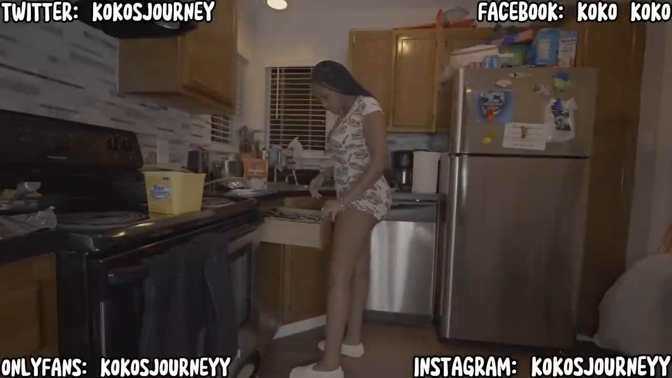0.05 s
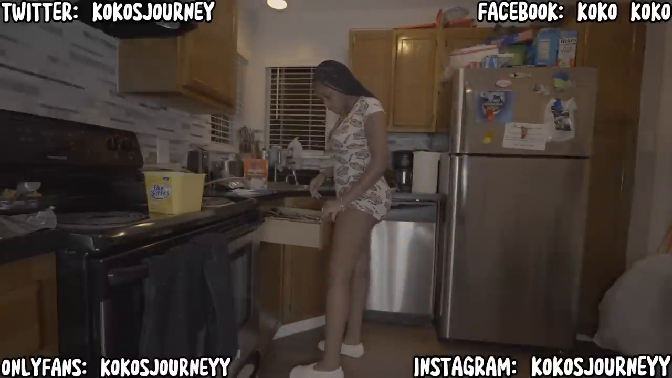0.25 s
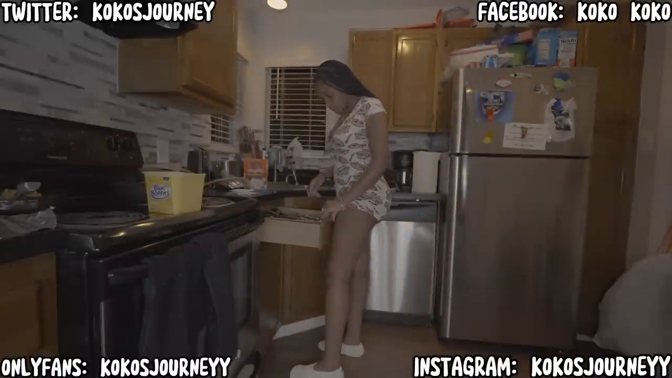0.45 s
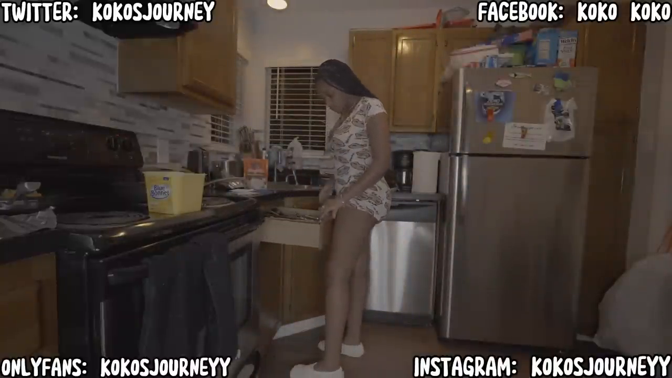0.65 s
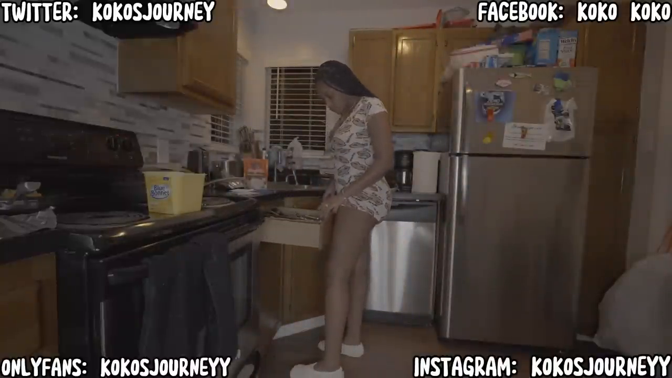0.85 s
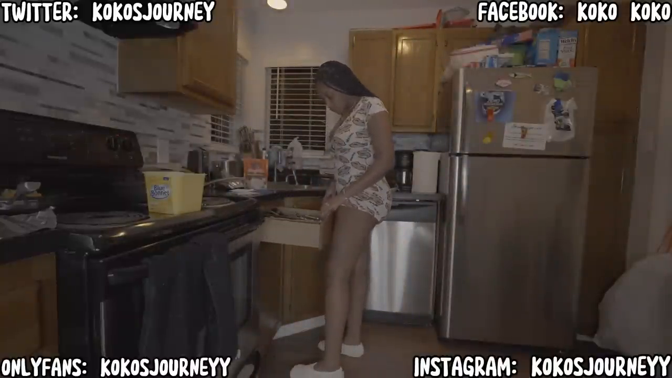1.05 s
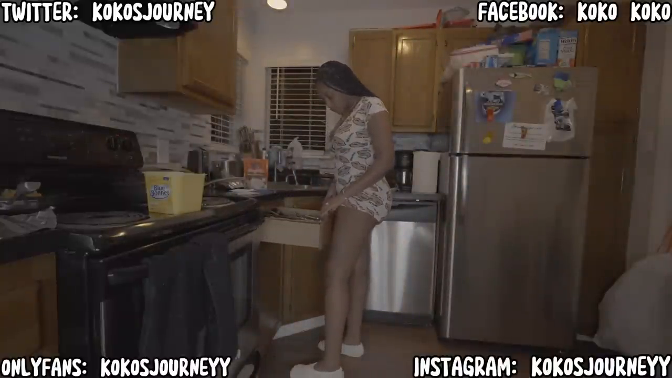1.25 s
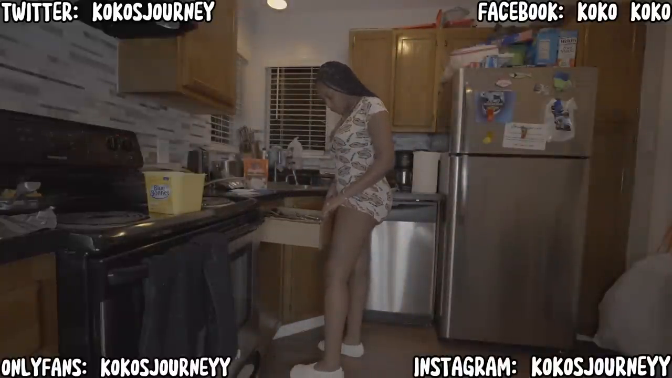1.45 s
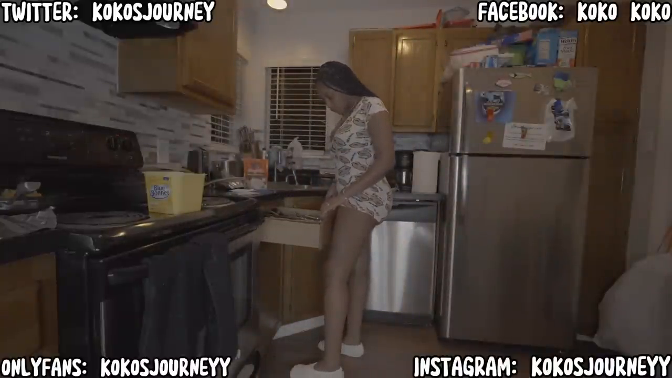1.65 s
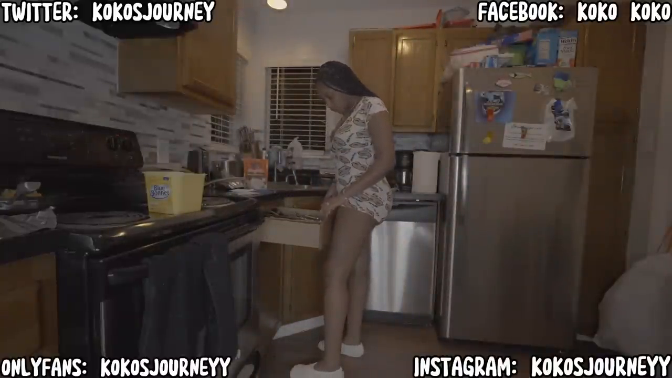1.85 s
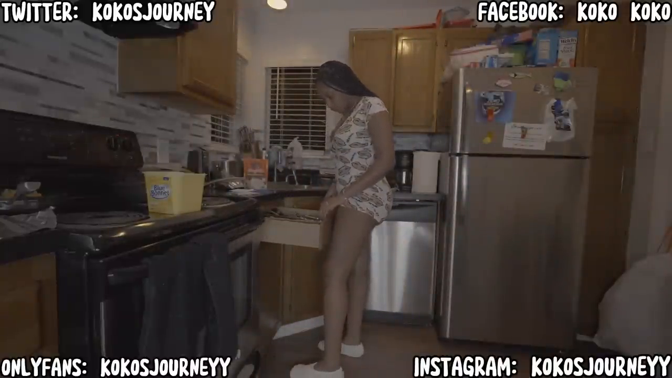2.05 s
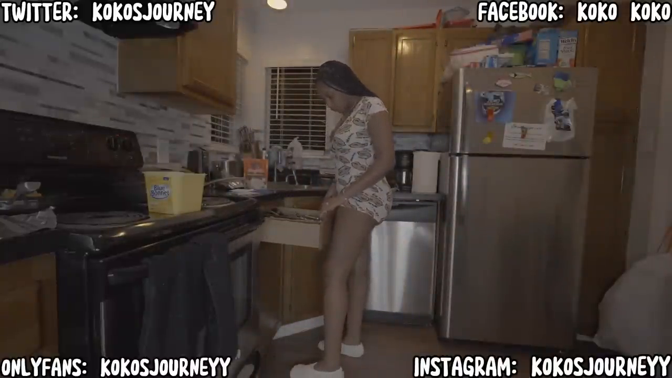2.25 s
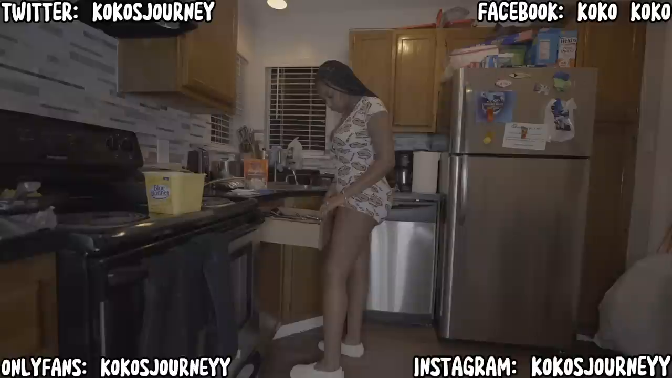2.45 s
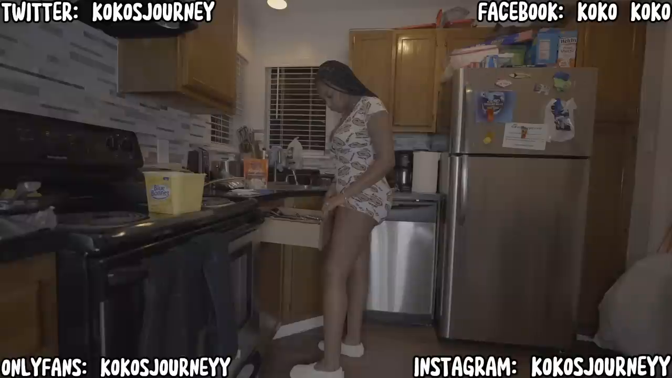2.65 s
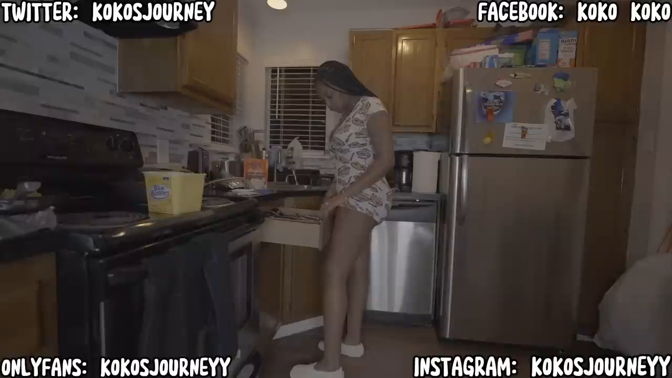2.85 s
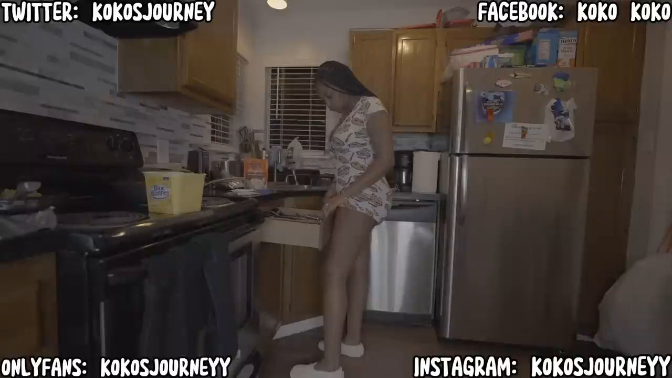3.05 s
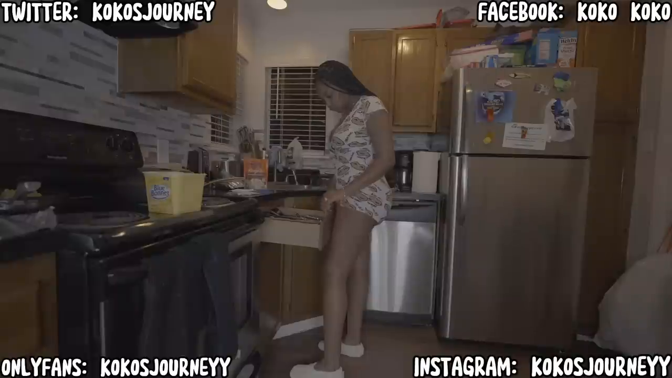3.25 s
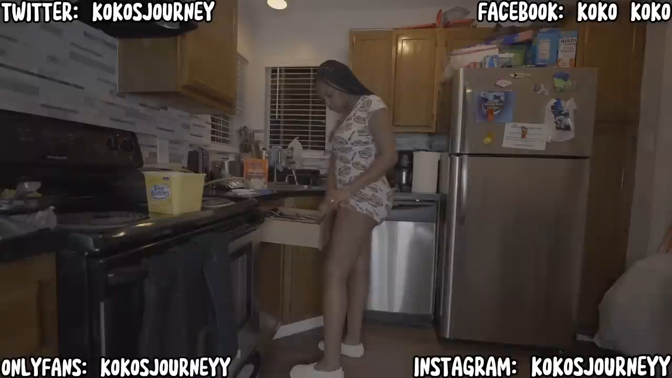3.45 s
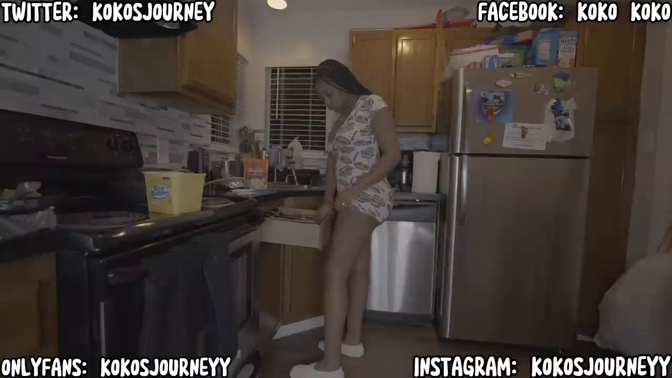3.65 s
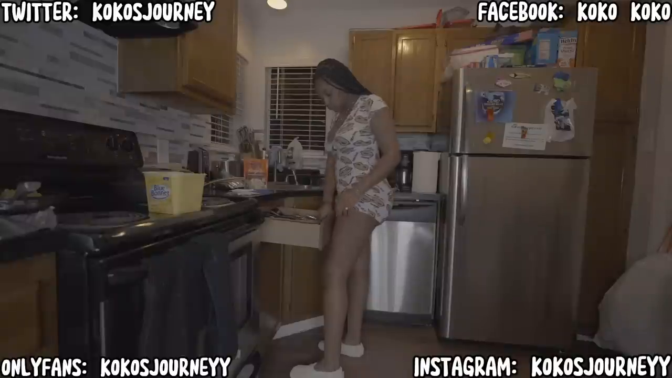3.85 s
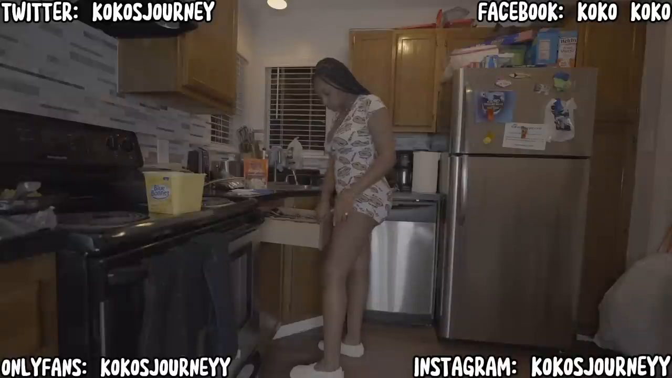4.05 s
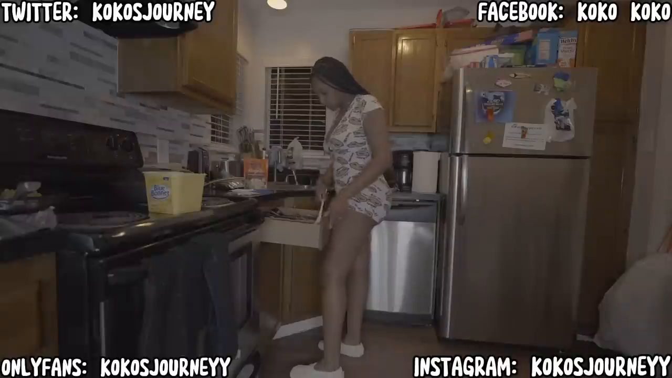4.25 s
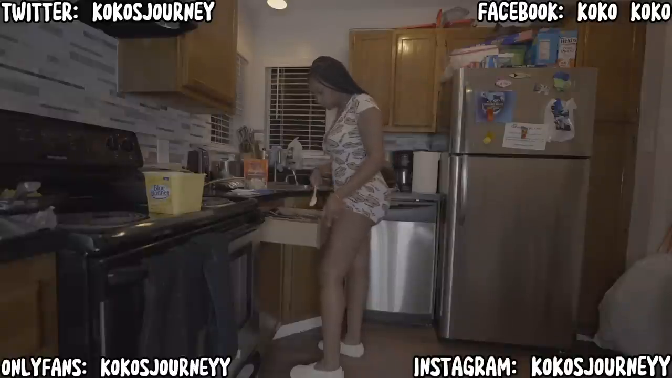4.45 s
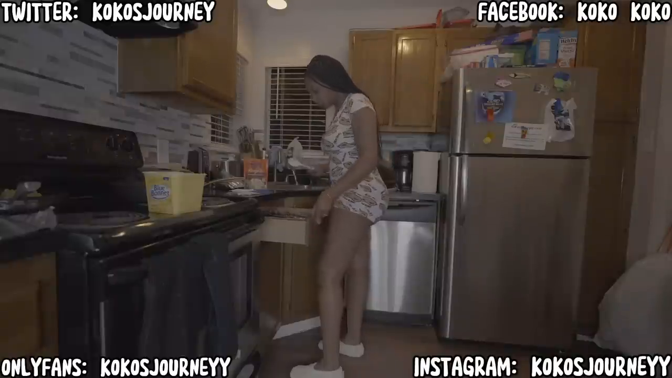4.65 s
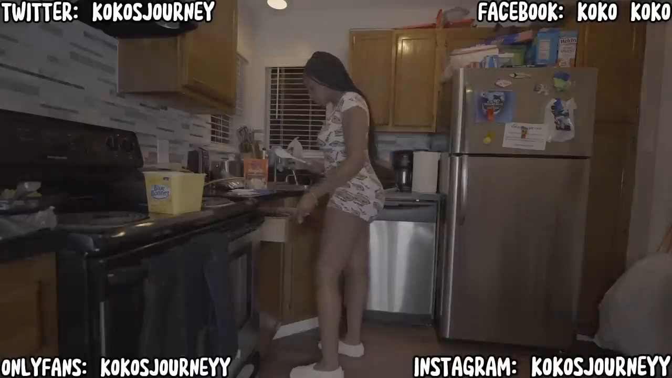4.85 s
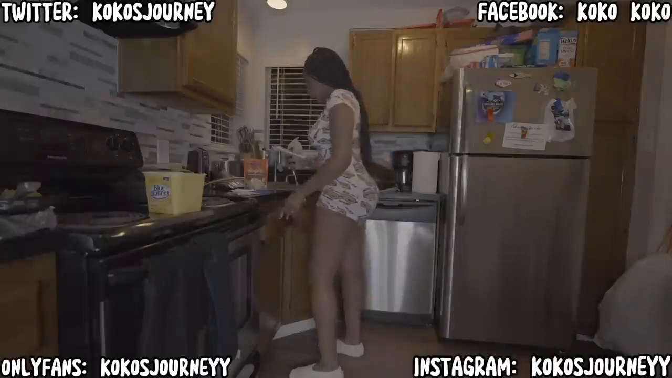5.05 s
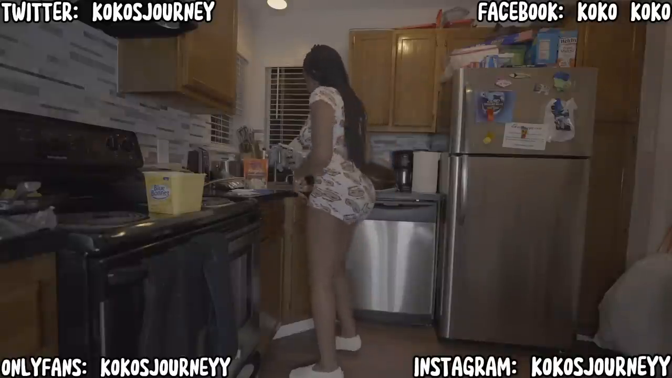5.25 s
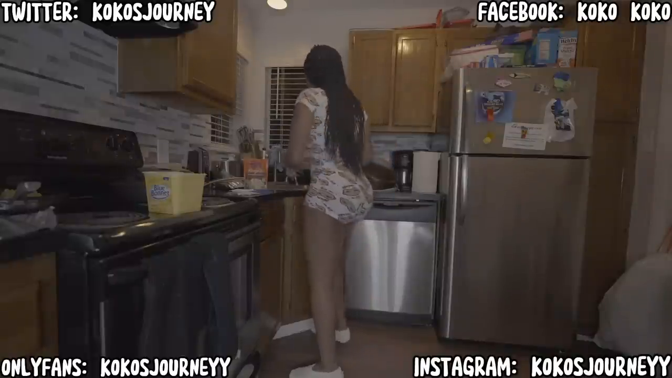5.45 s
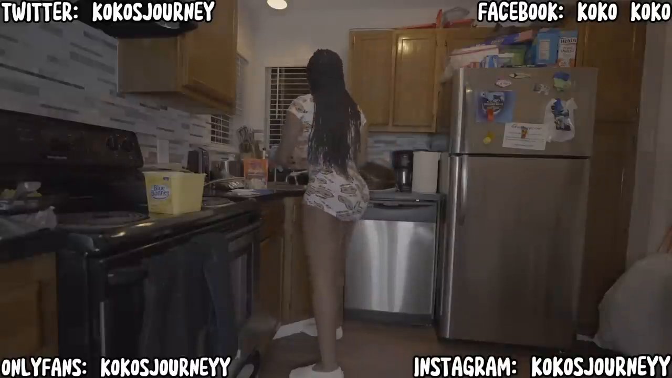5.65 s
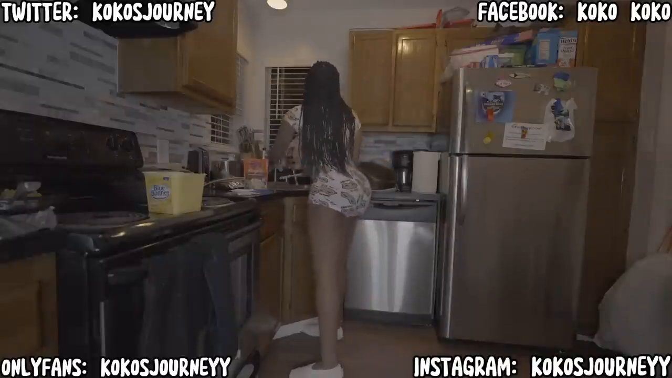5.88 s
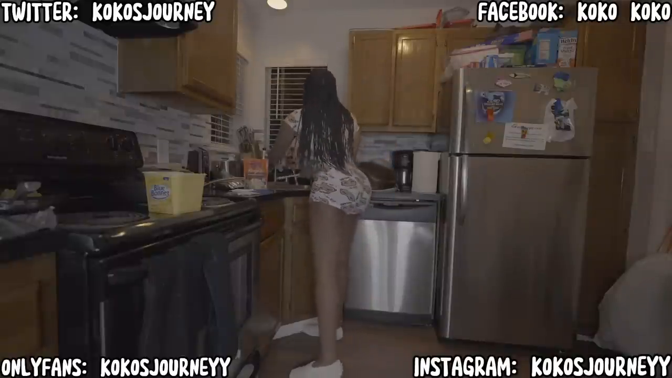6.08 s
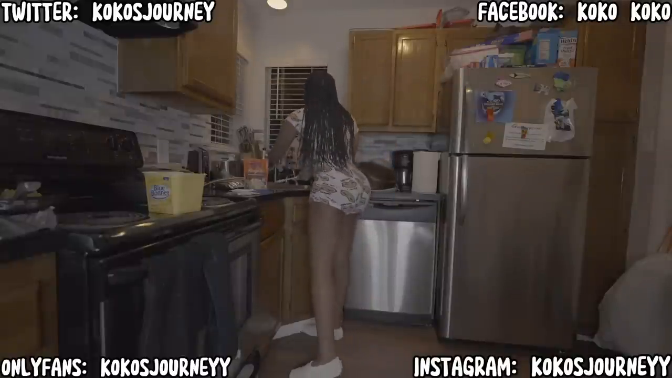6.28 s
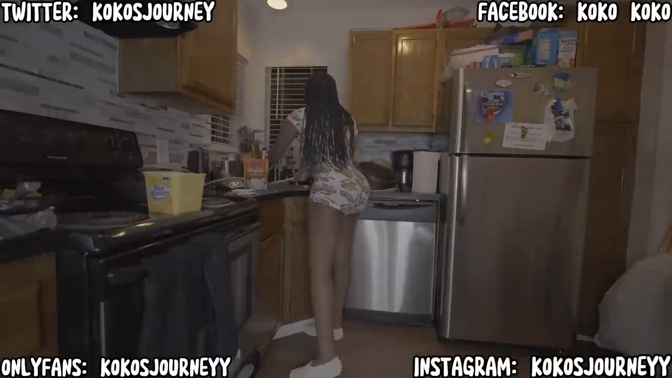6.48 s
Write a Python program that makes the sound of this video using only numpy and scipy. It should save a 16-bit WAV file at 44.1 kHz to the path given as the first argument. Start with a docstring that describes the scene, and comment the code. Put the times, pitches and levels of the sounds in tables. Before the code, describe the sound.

Someone rummages through a kitchen cutlery drawer, utensils clacking and rattling in their tray, then draws out a ringing blade and slams the drawer shut.

```python
"""A small, hard kitchen, where someone rummages in a cutlery drawer a few metres from a microphone pair.
Utensils swish, and clack in their tray: chattering impacts excite damped resonances. Knocks excite the wood.
A blade is drawn out: stick-slip friction sets its steel modes ringing, and clinks ring a fork's modes.
The drawer rolls along its runners and slams, booming; cutlery slides over itself, the contents rebound,
and something brushes along the counter. Filtered noise supplies the quiet air of the room."""
import sys
import numpy as np
from scipy import signal
from scipy.fft import rfft, irfft, next_fast_len
from scipy.io import wavfile

SR = 44100
rng = np.random.default_rng(int(sys.argv[2]) if len(sys.argv) > 2 else 0)


def dump_mix(stems):
    """Bounce the given channels to the path in sys.argv[1] as a 16-bit WAV at rate SR."""
    frames = np.atleast_2d(stems).T  # one column per channel
    limited = np.clip(frames, -1, 1)  # hard clip at full scale
    pcm = np.round(limited * 32767).astype(np.int16)
    wavfile.write(sys.argv[1], SR, pcm)


N = 287486
HZ = np.fft.rfftfreq(4096, 1 / SR)  # frequency axis of every response
TIME = np.arange(N) / SR

# Levels in the tables are relative: the gains of the functions are added to them.
# The drawer hitting its stop. Start in seconds, level in dB, treble against level in dB, chatter T60 in seconds.
SLAM = (5.272, -10.5, -18.5, 1)
# The blade dragged out, then its tip flicking free. Each row: start in seconds, length in seconds, level in dB.
DRAWS = [(4.276, .445, -19.3), (4.77, .02, -16.3)]
# Broad colour of the wooden drawer. Each row: frequency in Hz, relative density in dB per Hz.
WOOD = [(71, -58), (120, -16), (204, -21), (251, -3.5), (473, -8.5), (535, -2.5), (727, -6), (1070, -5),
        (1210, -15.5), (3240, -6.5), (5190, -12.5), (10200, -12.5), (16000, -25)]
# Broad colour of rubbed steel. Each row: frequency in Hz, relative density in dB per Hz.
STEEL = [(710, -30), (1200, 6), (3740, 2.5), (4310, 7), (5300, 3), (9210, 6), (11100, 7), (16000, 6.5)]


def tray(gain_db=29.5):
    """Impact excitation: each clack sounds the tray's hollow note and random damped resonances of a utensil."""
    # Broad colour of the tray. Each row: frequency in Hz, relative density in dB per Hz.
    tray_colour = [(120, -42), (200, -32), (320, -2), (430, -12), (720, -8.5), (900, -1), (1080, -7),
                   (1500, -2.5), (1900, -4), (2300, -1), (4000, -0.5), (9500, -0.5), (13300, -4.5),
                   (16000, -8)]
    # Its resonances. Each row: frequency in Hz, width in Hz, lift in dB.
    tray_peaks = [(310, 40, 4.5), (1415, 100, 5), (1624, 127, 7), (2210, 270, 5.5), (2610, 90, 4),
                  (3050, 110, 4.5), (5050, 110, 6)]
    # Its hollow note, a close pair. Each row: frequency in Hz, width in Hz, full lift in dB.
    hollow_pair = [(860, 110, 7), (922, 95, 10)]
    # The ring of a really hard clack. Each row: frequency in Hz, width in Hz, full lift in dB.
    clank_peaks = [(1350, 500, 3)]
    out = np.zeros((2, N))
    response = body(tray_colour, tray_peaks)
    for s, db, treble_db in shakes():
        # heavy blows reach the tray's floor and sound its hollow note most
        hollow = np.interp(db, [-28, -12], [.5, .95]) * bumps(hollow_pair)
        utensil = bumps([(hz, 300, 3) for hz in rng.uniform(1800, 13000, size=8)])
        clank = np.interp(db, [-14, -12], [0, 1]) * bumps(clank_peaks)
        struck = response + hollow + clank + utensil
        add(out, s, blow(struck, db + gain_db, treble_db, t60=.036, tick_db=-2))
    return out


def shakes():
    """Repeated impacts, yielded as (s, level dB, treble dB): brighter through a shake as loose steel catches up."""
    # Utensils clacking in the tray. Each row: time in seconds, level in dB.
    clack_rows = [(0.832, -15.3), (1.182, -12.5), (1.203, -16.5), (1.23, -16), (1.304, -16.5),
                  (1.436, -17.5), (1.473, -15), (1.607, -22), (1.647, -15), (1.795, -17), (1.841, -14),
                  (1.96, -17.5), (2.006, -14.5), (2.035, -14.5), (2.169, -12), (2.197, -14), (2.237, -14),
                  (2.376, -21.5), (2.394, -13), (2.429, -16), (2.565, -20), (2.585, -17), (2.632, -14.5),
                  (2.774, -16), (2.81, -18), (2.907, -19.5), (2.966, -16), (2.999, -17), (3.101, -11),
                  (3.173, -14)]
    pause_s = .085  # a longer gap ends a shake
    gentle_db = -16  # a shake whose first clack is weaker is led by a faint nudge
    nudge_lead_s, nudge_db, nudge_treble_db = .046, -28, -12
    dull_db, bright_db = -9.5, -2.5
    clacks = np.array(clack_rows)
    shake_starts = np.flatnonzero(np.diff(clacks[:, 0]) > pause_s) + 1
    for shake in np.split(clacks, shake_starts):
        start, first_db = shake[0]
        if first_db < gentle_db:
            yield start - nudge_lead_s, nudge_db, nudge_treble_db
        # reversed, so that a lone clack is bright
        trebles_db = np.linspace(bright_db, dull_db, len(shake))[::-1]
        for (s, db), treble_db in zip(shake, trebles_db):
            yield s, db, treble_db


def drawer(gain_db=28, treble_db=7, octaves=0.54):
    """Local modal excitation: each spot on the wooden box favours its own register, the stiff ones most."""
    # Blows on the wood. Each row: time in seconds, level in dB, treble against level in dB, favoured pitch in Hz.
    knock_rows = [(0.981, -28.5, -6, 1500), (1.003, -17, -11, 2000), (1.016, -12.7, -17, 920),
                  (3.44, -29.5, -19, 1100), (3.599, -26.5, -45, 250), (3.613, -23.5, -23, 340),
                  (3.723, -23.5, -21, 290), (3.755, -19.5, -21, 1400), (3.785, -15.5, -36, 660),
                  (3.788, -12, -9, 1600), (3.886, -20, -11, 270), (3.918, -13.3, -3, 525),
                  (4.056, -26, -6, 1860), (4.093, -13.5, -2, 516), (4.115, -16.5, -4, 2200),
                  (4.14, -18.5, -2, 3600), (4.168, -12, -45, 320), (4.205, -16, -23, 640),
                  (4.244, -16, -43, 290), (4.295, -20.5, -8, 2290), (4.356, -17.5, -5, 1100),
                  (4.569, -20, -10, 1300), (4.815, -17.5, -18, 880), (5.095, -19, -20, 400),
                  (5.74, -40, -8, 330)]
    # Resonances of the wood. Each row: frequency in Hz, width in Hz, lift in dB.
    wood_peaks = [(324, 78, 3.6), (530, 41, 3.3), (700, 180, 1.05), (1400, 420, 2.4), (2480, 140, 1.3)]
    bump_t60, knock_t60 = .11, .055  # chatter of a dull bump and of a sharp knock, s
    out = np.zeros((2, N))
    response = body(WOOD, wood_peaks)
    for s, db, bright_db, hz in knock_rows:
        focus_db = np.interp(hz, [500, 1600], [10, 17])
        distance = np.log2((HZ + 1) / hz) / octaves
        spot = focus_db * np.exp(-distance ** 2)
        t60 = np.interp(bright_db, [-40, -18], [bump_t60, knock_t60])
        add(out, s, blow(response + spot, db + gain_db, bright_db + treble_db, t60, tick_db=-4))
    return out


def slam(gain_db=31.6, treble_db=15, boom_db=-.5):
    """Panel modes: the drawer front strikes the cabinet, whose panels boom as decaying sinusoids."""
    # Broad colour of the cabinet. Each row: frequency in Hz, relative density in dB per Hz.
    cabinet_colour = [(18, -40), (30, -9), (233, -1.5), (415, -2), (512, -1), (684, -4.5), (780, 0),
                      (988, -6), (1910, -4), (4190, -14.5), (11400, -29), (14000, -33), (16000, -31)]
    # Panel modes. Each row: frequency in Hz, level in dB, T60 in seconds.
    boom_modes = [(64.2, -28, 0.71), (78, -30, .5), (109.7, -27, 0.5), (157, -20.5, .4), (239, -22, 0.28),
                  (323, -22, .25)]
    out = np.zeros((2, N))
    t = np.arange(SR) / SR
    s, db, bright_db, t60 = SLAM
    add(out, s, blow(body(cabinet_colour), db + gain_db, bright_db + treble_db, t60, tick_db=-5))
    boom = np.zeros(len(t))
    for hz, mode_db, ring in boom_modes:
        boom += amp(mode_db - 60 * t / ring) * np.sin(2 * np.pi * (hz * t + rng.random()))
    onset = 1 - np.exp(-t / 0.0029)
    add(out, s, amp(boom_db) * boom * onset)
    return out


def rebounds(gain_db=28, treble_db=-6, count=3):
    """Inelastic rebound: thrown forward by the slam, the contents bump the drawer's front, weaker each time."""
    spacing_s, first_db, loss_db, chatter_t60 = .074, -17, 3.5, .18
    out = np.zeros((2, N))
    response = body(WOOD, [(1400, 1200, 11)])
    for k in range(count):
        s = SLAM[0] + (k + 1) * spacing_s
        db = first_db - k * loss_db
        add(out, s, blow(response, db + gain_db, treble_db, chatter_t60, tick_db=-6))
    return out


def blade(rub_db=-3, ring_db=-.5, flick_db=-10, ring_share=.87, bend_db=0):
    """Friction-driven vibration: a blade dragged over other steel rubs brightly and rings in its modes."""
    # High modes of the blade. Each row: frequency in Hz, relative level in dB.
    blade_modes = [(5873, -48), (6175, -40.5), (7639, -42), (8096, -39), (9830, -44), (10427, -45),
                   (11106, -37.5), (11429, -38), (12209, -45), (12678, -38), (13060, -42), (14126, -37),
                   (15122, -30.5), (15601, -38), (15665, -48)]
    # The blade catching and singing in its low bending mode. Each row: start in seconds, level in dB.
    catch_rows = [(4.29, -32), (4.48, -35), (4.565, -27), (4.62, -27), (4.7, -34)]
    bend_hz, catch_s = 4312, .095
    ring_rise_s, ring_sag, ring_stop = .23, 8, 150  # s, dB/s, dB/s
    rub = friction(body(STEEL), per_s=900, spread_db=3) * dragging() * waver(depth_db=1.2, per_s=30)
    modes = sum(amp(db) * sing(hz, width_hz=45) for hz, db in blade_modes)
    # the ringing builds slowly and begins to die before the rubbing stops
    start, length, db = DRAWS[0]
    ringing = stroke(start, ring_share * length, db + ring_db, ring_rise_s, ring_sag, ring_stop)
    start, length, db = DRAWS[1]
    ringing += stroke(start, length, db + flick_db, length, ring_sag, ring_stop)
    out = amp(rub_db) * rub + evened(modes) * ringing
    t = np.arange(round(catch_s * SR)) / SR
    swell = np.sin(np.pi * t / catch_s) ** 2
    for s, db in catch_rows:
        tone = np.sin(2 * np.pi * (bend_hz * t + .3 * rng.random((2, 1))))
        add(out, s, amp(db + bend_db) * np.sqrt(2) * tone * swell)
    return out


def dragging():
    """Friction gain of the blade: it starts at once, grows as the blade comes out, and stops quickly."""
    rise_s, swell_db_per_s, stop_db_per_s = .008, 9, 220
    return sum(stroke(*draw, rise_s, -swell_db_per_s, stop_db_per_s) for draw in DRAWS)


def sing(hz, width_hz):
    """Noise-driven resonance: one steel mode kept ringing by friction, swelling as the contact point moves."""
    pole = np.exp((2j * np.pi * hz - np.pi * abs(width_hz)) / SR)
    swell = waver(depth_db=4, per_s=20)
    ring = signal.lfilter([1], [1, -pole], rng.standard_normal((2, N))).real
    return evened(ring * swell)


def cutlery(slide_db=-2, ping_db=-9, swish_db=0):
    """Friction and micro-impacts: loose pieces slide and jingle, also while the blade drags past them."""
    # Loose cutlery sliding over itself. Each row: start in seconds, length in seconds, level in dB.
    slide_rows = [(4.08, .19, -16.5), (5.285, .29, -15.7)]
    # A hand swishing lightly among the utensils. Each row: start in seconds, length in seconds, level in dB.
    swish_rows = [(-.03, .085, -23), (.321, .125, -27.7)]
    # Broad colour of a swish. Each row: frequency in Hz, relative density in dB per Hz.
    swish_colour = [(710, -48), (1200, -7), (1510, -6), (1700, 5), (2320, -0.5), (3790, 1.5), (4220, -0.5),
                    (5900, 8), (14500, -3), (16000, -19)]
    # strokes: rise in s, sag in dB/s, stop in dB/s
    sliding = sum(stroke(*row, .1, 66, 230) for row in slide_rows)
    swishing = sum(stroke(*row, .045, 28, 145) for row in swish_rows)
    slide = friction(body(STEEL), per_s=500, spread_db=3) * sliding
    pings = jingle() * (sliding + .6 * dragging())
    swish = hiss(body(swish_colour, [(5950, 250, 4), (7640, 150, 3)])) * swishing
    return amp(slide_db) * slide + amp(ping_db) * pings + amp(swish_db) * swish


def jingle(count=1100, t60=0.18):
    """Micro-impacts: small touches between loose pieces, each a decaying ping at a pitch of its own."""
    out = np.zeros((2, N))
    t = np.arange(SR // 6) / SR
    for when, pitch, size, *phase in rng.random((count, 5)):
        hz = 3000 + 12500 * pitch ** 1.3
        ping = np.sin(2 * np.pi * (hz * t + np.array(phase)[:, None]))
        add(out, when * N / SR, ping * amp(9.6 * size - 60 * t / t60))
    return evened(out)


def fork(gain_db=-1, t60=0.4, spread_db=3, beat_hz=25):
    """Modal beating: a fork struck by its neighbours rings in close pairs of modes, scaled for each piece."""
    # Clinks. Each row: time in seconds, level in dB, pitch factor of the piece.
    clink_rows = [(3.625, -35, 0.75), (3.791, -18.5, 1), (3.921, -28, 0.58), (4.057, -42, 0.97),
                  (4.138, -18, 0.7), (4.283, -20, 0.96), (4.774, -26, 0.73), (5.5, -28, .44)]
    # Modes at pitch factor 1. Each row: frequency in Hz, relative level in dB.
    fork_modes = [(5857, -12), (7687, -8), (10379, -4), (11111, -7), (12209, -5), (13630, -8), (13802, -2),
                  (14125, -11), (15137, -3)]
    out = np.zeros((2, N))
    t = np.arange(SR // 2) / SR
    onset = 1 - np.exp(-t / 0.0035)
    hz, db = np.transpose(fork_modes)
    for s, strength_db, pitch in clink_rows:
        # axes: ear, member of the pair, mode, time
        size, detune, phase = rng.standard_normal((3, 2, 2, len(hz), 1))
        mode_hz = pitch * hz[:, None] + beat_hz * detune
        modes = amp(db[:, None] + spread_db * size) * np.sin(2 * np.pi * (mode_hz * t + phase))
        decay = amp(strength_db + gain_db - 60 * t / t60)
        add(out, s, evened(modes.sum((1, 2))) * decay * onset)
    return out


def rubbing(roll_db=-4, brush_db=0):
    """Structure-borne friction: the runners rumble through the drawer's wood; later a soft brush on the counter."""
    # The drawer pushed along its runners at an even pace. Start in seconds, length in seconds, level in dB.
    roll_row = (4.3, 1.0, -27.2)
    # Something brushing along the counter. Start in seconds, length in seconds, level in dB.
    brush_row = (6.142, .4, -28)
    # Broad colour of the runners. Each row: frequency in Hz, relative density in dB per Hz.
    runner_colour = [(88, -48), (150, -25.5), (303, -6), (422, -9), (689, -6.5), (790, -4), (960, -5.5),
                     (2060, -12.5), (4160, -32), (8230, -32), (16000, -44)]
    # Broad colour of the counter. Each row: frequency in Hz, relative density in dB per Hz.
    counter_colour = [(120, -45), (200, -7.5), (273, -15), (311, -6.5), (432, -12), (509, -9.5),
                      (635, -9.5), (867, -4.5), (1140, -7.5), (2210, -1.5), (3760, -20), (5230, -15),
                      (13800, -19.5), (16000, -14)]
    roll = friction(body(runner_colour, [(302, 56, 8.3)]), per_s=250, spread_db=3.5)
    roll *= stroke(*roll_row, rise_s=.09, sag_db_per_s=.5, stop_db_per_s=300)
    brush = friction(body(counter_colour, [(310, 70, 4)]), per_s=870, spread_db=3.5)
    brush *= stroke(*brush_row, rise_s=.08, sag_db_per_s=11, stop_db_per_s=300)
    return amp(roll_db) * roll + amp(brush_db) * brush


def air():
    """Coloured stationary noise: the room's own sound, whose level dips twice, quickly, and recovers slowly."""
    # Broad colour of the room noise. Each row: frequency in Hz, relative density in dB per Hz.
    air_colour = [(12, -65), (20, -2.5), (91, -4), (177, -9.5), (270, -8.5), (357, -10), (558, -7),
                  (678, -7), (1090, -5), (1190, -3.5), (3630, -12.5), (4180, -14.5), (11400, -18),
                  (16000, -18.5)]
    # Dips in level. Each row: start in seconds, hold in seconds, depth in dB.
    dip_rows = [(4.24, .03, 21), (5.4, .6, 7.5)]
    level_db, fall_s, recover_s = -37.7, .09, .42
    dip_db = np.zeros(N)
    for s, hold, depth in dip_rows:
        corners = s + np.cumsum([0, fall_s, abs(hold), recover_s])
        dip_db += np.interp(TIME, corners, [0, depth, depth, 0])
    return hiss(body(air_colour)) * amp(level_db - dip_db) * waver(depth_db=.5, per_s=12)


def blow(response, db, treble_db, t60, tick_db):
    """Source-filter impact: a first contact and a dying chatter, coloured by the struck body and the room."""
    t = np.arange(SR // 4) / SR
    contacts = rng.standard_normal(len(t)) * (rng.random(len(t)) < .04)
    chatter = contacts * amp(-60 * t / max(t60, .005))
    # the treble setting acts in full from 9 kHz, not at all below 2 kHz
    hardness = np.clip(np.log(HZ / 2000 + 1e-6) / np.log(9000 / 2000), 0, 1)
    # the chatter and the first contact each have echoes of their own
    force = signal.fftconvolve(chatter[None] / np.linalg.norm(chatter), kitchen(), axes=1)
    add(force, 0, amp(tick_db) * kitchen())
    sound = signal.fftconvolve(force, causal(response + treble_db * hardness)[None], axes=1)
    return amp(db) * np.sqrt(2) * sound / np.linalg.norm(sound)


def friction(response, per_s, spread_db):
    """Stick-slip: countless tiny slips of uneven size, scattered over three spots in the room."""
    out = np.zeros((2, N))
    for spot in range(3):
        slips = rng.standard_normal(N) * (rng.random(N) < per_s / SR)
        slips *= amp(spread_db * np.minimum(rng.exponential(1, N), 4))
        path = signal.fftconvolve(kitchen(), causal(response)[None], axes=1)
        out += signal.oaconvolve(slips[None], path, axes=1)[:, :N]
    return evened(out)


def stroke(start, length, db, rise_s, sag_db_per_s, stop_db_per_s):
    """Friction follows speed: the gain of a movement gathers, sags (or swells if negative), and dies away."""
    t = TIME - start
    sag_db = sag_db_per_s * np.clip(t - rise_s, 0, length)
    stop_db = abs(stop_db_per_s) * np.maximum(t - length, 0)
    return np.clip(t / rise_s, 0, 1) * amp(db - (sag_db + stop_db))


def kitchen(direct_db=-10, early_db=-17):
    """Room impulse response: direct sound, reflections off counter and doors, then a dense decaying tail."""
    # Reverberation. Each row: frequency in Hz, T60 in seconds.
    room_t60 = [(100, 0.28), (500, 0.28), (1400, 0.35), (4000, 0.38), (10000, 0.36), (16000, 0.083)]
    taps = rng.choice([-1., 1.], (2, 16384)) * (rng.random((2, 16384)) < .2)
    hz, t, z = signal.stft(paired(taps), SR, nperseg=256)
    decay = amp(-60 * t / read(room_t60, hz)[:, None])
    tail = signal.istft(z * decay, SR, nperseg=256)[1]
    tail /= np.linalg.norm(tail[0])
    early = np.zeros_like(tail)
    delays = rng.integers(50, 1000, (2, 8))  # samples
    np.put_along_axis(early, delays, rng.choice([-1., 1.], (2, 8)), 1)
    response = tail + amp(early_db) * paired(early)
    response[:, 0] += amp(direct_db)
    return response / np.linalg.norm(response[0])


def paired(x):
    """Spatial coherence: two unrelated signals become a microphone pair, alike in the bass but not the treble."""
    # Coherence of the pair. Each row: frequency in Hz, left-right correlation.
    coherence = [(60, 0.98), (300, 0.96), (700, .76), (1400, 0.55), (2800, 0.3), (5600, 0.039),
                 (16000, 0.084)]
    size = x.shape[1]
    same = np.clip(read(coherence, np.fft.rfftfreq(size, 1 / SR)), -1, 1)
    mid, side = rfft(x) * np.sqrt([(1 + same) / 2, (1 - same) / 2])
    return irfft([mid + side, mid - side], size)


def hiss(response):
    """Filtered white noise: steady coloured noise at both microphones."""
    noise = paired(rng.standard_normal((2, next_fast_len(N + 4096))))
    return evened(signal.oaconvolve(noise, causal(response)[None], "valid", axes=1)[:, :N])


def waver(depth_db, per_s):
    """Slow amplitude modulation: a random gain, interpolated between knots."""
    knots = rng.standard_normal(2000)
    return amp(depth_db * np.interp(TIME * per_s, np.arange(len(knots)), knots))


def body(spectrum, peaks=()):
    """Frequency response of an object in dB: broad colour plus its resonances."""
    return read(spectrum, HZ) + bumps(peaks)


def bumps(peaks):
    """Resonance curves: the summed dB lift of peaks given as (Hz, width Hz, lift dB)."""
    return sum(db / (1 + (2 * (HZ - f) / width) ** 2) for f, width, db in peaks)


def causal(db):
    """Minimum phase: the causal impulse response, of energy 1, that has this dB response."""
    log_gain = np.log(amp(np.maximum(db - db.max(), -100)))
    both_sides = np.r_[log_gain, log_gain[-2:0:-1]]
    # the phase is the Hilbert transform of the log gain
    spectrum = np.exp(np.conj(signal.hilbert(both_sides)))
    taps = np.fft.ifft(spectrum).real
    return taps / np.linalg.norm(taps)


def read(points, hz):
    """Logarithmic frequency scale: interpolates a table along it."""
    f, value = np.transpose(points)
    return np.interp(np.log(hz + 1), np.log(f + 1), value)


def amp(db):
    """Decibel law: decibels to amplitude gain."""
    return 10 ** (np.asarray(db) / 20)


def evened(x):
    """Root-mean-square normalization: scales to rms 1."""
    return x / np.sqrt(np.mean(x ** 2) + 1e-20)


def add(mix, s, sound):
    """Superposition: mixes a sound in at time s."""
    part = mix[..., max(round(s * SR), 0):][..., :sound.shape[-1]]
    part += sound[..., :part.shape[-1]]


def scene():
    """Superposition of blows, friction, ringing steel and room noise, the right channel slightly louder."""
    blows = tray() + drawer() + slam() + rebounds()
    steel = blade() + cutlery() + fork()
    return (blows + steel + rubbing() + air()) * amp([[-.2], [.2]])


def record(dry, ceiling=1.0):
    """Saturation and band limit: soft limiting of the peaks, then a low-pass filter."""
    edge_hz = 15900
    limited = ceiling * np.tanh(dry / ceiling)
    low_pass = signal.firwin(511, edge_hz, window=("kaiser", 8), fs=SR)
    return signal.oaconvolve(limited, low_pass[None], "same")


dry = scene()
out = record(dry)
dump_mix(out)
```